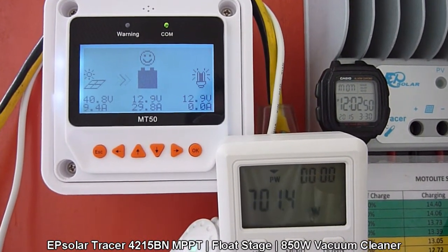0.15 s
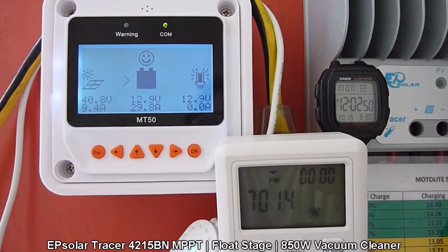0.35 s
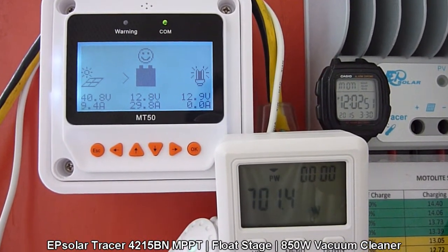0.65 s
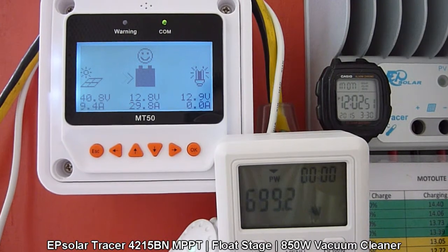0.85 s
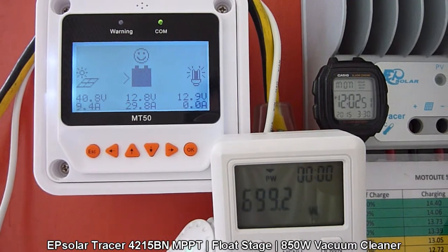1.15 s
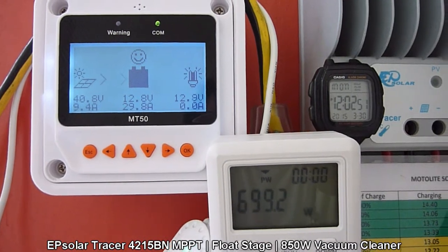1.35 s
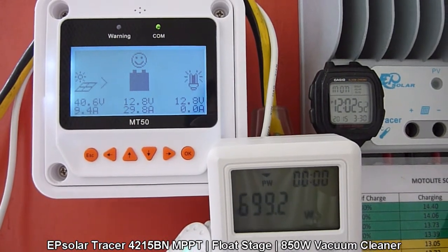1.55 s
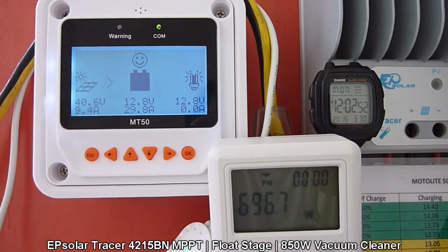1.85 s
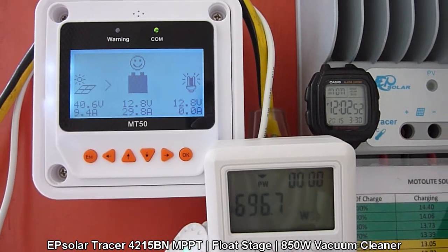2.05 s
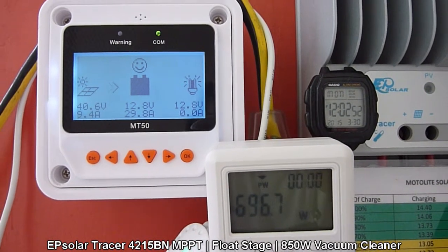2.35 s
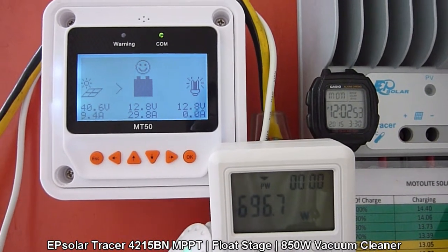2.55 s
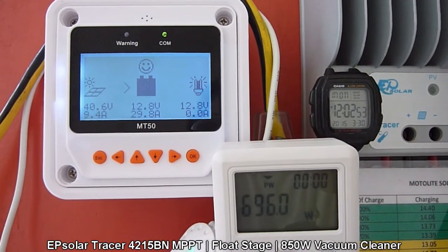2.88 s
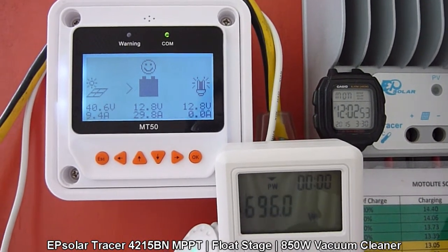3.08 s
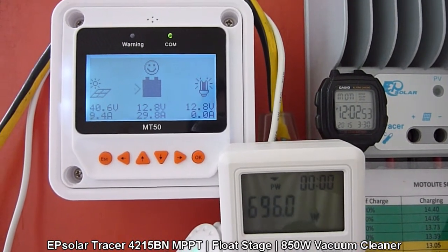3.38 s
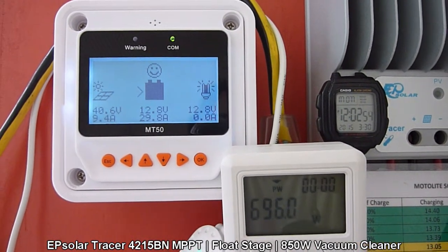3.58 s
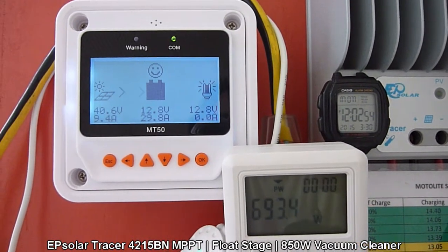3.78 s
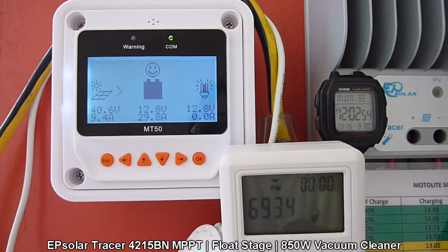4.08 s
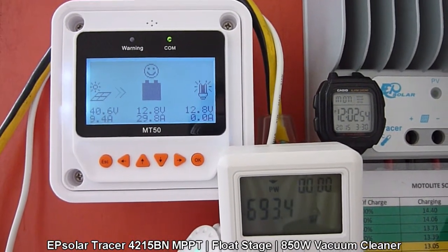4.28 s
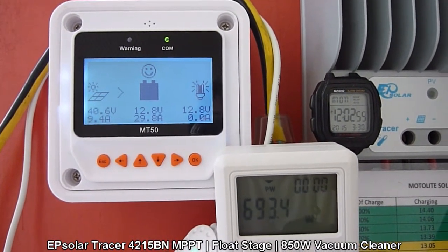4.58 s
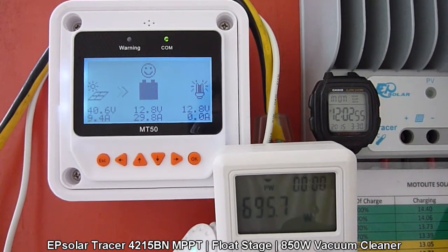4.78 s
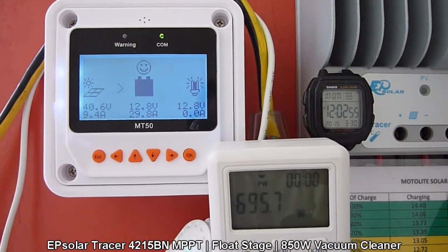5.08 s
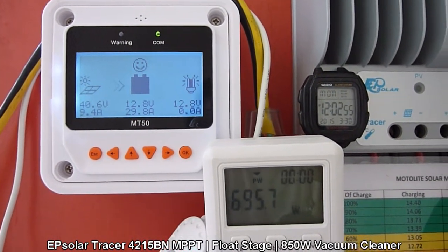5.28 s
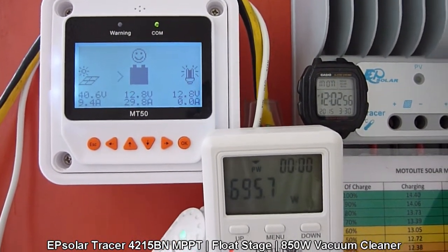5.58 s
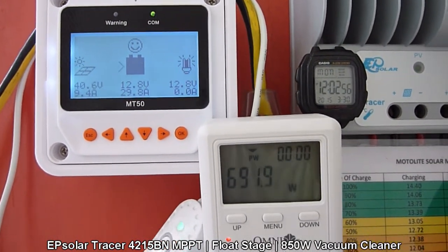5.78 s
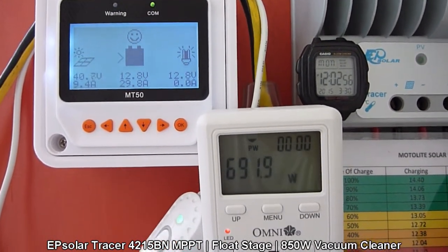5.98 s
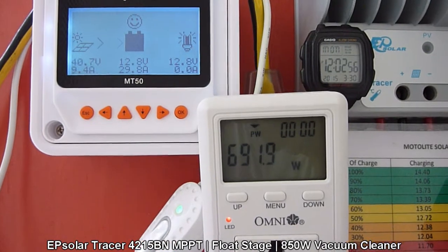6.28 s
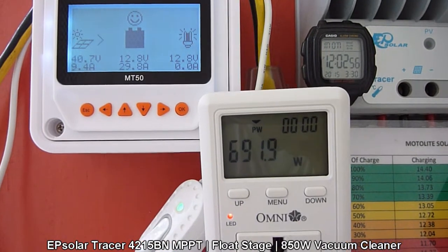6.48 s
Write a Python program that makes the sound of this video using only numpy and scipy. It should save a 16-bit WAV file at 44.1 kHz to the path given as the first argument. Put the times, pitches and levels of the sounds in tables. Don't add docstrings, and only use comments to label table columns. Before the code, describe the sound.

A vacuum cleaner runs continuously a few metres away in a small hard room. Dense, hollow air roar dominates, strongest in the mids, over a steady low motor hum. A thin, clear blade whine sits high above it, swelling and fading as the handheld microphone sways, sagging very slightly in pitch. The roar leans slightly left; the treble is dull and narrow-band. No start, stop or other event.

```python
import sys
import numpy as np
from scipy import signal
from scipy.fft import rfft, irfft
from scipy.io import wavfile

SR = 44100
rng = np.random.default_rng(int(sys.argv[2]) if len(sys.argv) > 2 else 0)


def amplitude_ratio(level_db):
    exponent = np.asarray(level_db, float) / 20
    return 10 ** exponent


def store_wav(level_fs):
    pcm = np.round(np.clip(np.atleast_2d(level_fs), -1, 1) * 32767)
    wavfile.write(sys.argv[1], SR, pcm.T.astype(np.int16))


N = 292824

BLADES, MAGNET_HZ = 12, 120.37
LEFT_LEAD_S, LEAD_TOP_HZ = 5e-5, 1600
SIDE = np.array([[.5], [-.5]])


def rms_one(x):
    return x / np.sqrt(np.mean(x ** 2) + 1e-20)


def in_time(rows):
    s, *columns = np.transpose(rows)
    return [np.interp(np.arange(N) / SR, s, c) for c in columns]


def at_hz(points, hz):
    table_hz, value = np.transpose(points)
    return np.interp(np.log(hz + 1), np.log(table_hz), value)


def drift(rate_hz):
    pole = np.exp(-80 * np.pi * rate_hz / SR)
    noise = rng.standard_normal(N // 40 + 2002)
    slow = signal.lfilter([1], [1, -2 * pole, pole ** 2], noise)[2000:]
    return np.interp(np.arange(N) / 40, np.arange(len(slow)), rms_one(slow - slow.mean()))


def blade_pitch():
    start_hz, sag_hz_per_s, settle_s = 3195.3, 4.7, 2.8
    drop_at_s, drop_length_s, drop_hz = 5.3, .55, 5.3
    s = np.arange(N) / SR
    sag_hz = sag_hz_per_s * np.minimum(s, settle_s)
    dropped = np.clip((s - drop_at_s) / drop_length_s, 0, 1)
    return start_hz - sag_hz - drop_hz * dropped


def motor_tones(blade_hz, blade_db, blade_pan_db):
    tone_orders = [(0, 1), (0, 2), (0, 3), (0, 4), (1, -1), (1, 0), (1, 1), (2, -2), (2, -1), (2, 0),
                   (2, 1), (4, 0), (6, 0), (13, 0), (14, -1), (14, 0), (14, 1), (14, 2), (18, 0), (24, 0)]
    # [level/dB rms, left-right/dB]
    tone_levels = [(-59, 2.5), (-45.5, 1.5), (-76, -4), (-57, 3), (-75, -1.5), (-38, 2), (-53.5, 1.5),
                   (-58.5, 0.5), (-72, 4), (-55, 1.5), (-63.5, 6.5), (-70.5, 3), (-43, 7), (-65.5, -3),
                   (-61.5, -2), (-55, -4), (-73, 5), (-65, 3), (-78, 3.5), (-76.5, -6.5)]
    shaft = 2 * np.pi * np.cumsum(blade_hz) / SR / BLADES
    magnet = 2 * np.pi * MAGNET_HZ * np.arange(N) / SR

    lean = amplitude_ratio(blade_pan_db * SIDE)
    blade_level = amplitude_ratio(blade_db + 1 + .9 * drift(10))
    out = blade_level * lean / lean.mean(axis=0) * np.sin(BLADES * shaft + .9 * SIDE)

    for (turns, pulls), (level_db, pan_db) in zip(tone_orders, tone_levels):
        hz = turns * blade_hz[0] / BLADES + pulls * MAGNET_HZ
        lead = 2 * np.pi * LEFT_LEAD_S * min(hz, LEAD_TOP_HZ)
        flutter_db = min(.4 + hz / 2500, 1.6) * drift(4)
        phase = turns * shaft + pulls * magnet + lead * SIDE
        out += amplitude_ratio(level_db + flutter_db + pan_db * SIDE) * np.sin(phase)
    return np.sqrt(2) * out


def room(hz):
    t60_s, tail_db, corner_hz = 0.12, -3, 1730.0
    s = np.arange(SR // 2) / SR
    tails = rng.standard_normal((2, len(s))) * amplitude_ratio(-60 * s / t60_s) * (s > .004)
    tails /= np.sqrt(np.sum(tails ** 2, axis=1, keepdims=True))
    rise = hz ** 2 / (hz ** 2 + corner_hz ** 2)
    return 1 + amplitude_ratio(tail_db) * rfft(tails, N) * rise


def air_roar(roar_db):
    # [f/Hz, level/dB per Hz]
    air = [(30, -36.5), (47, -31), (60, -18), (110, -21.5), (170, -10.5), (300, -7), (550, -5), (850, -5),
           (1400, 0), (1900, -3), (2300, -9), (2800, -8.5), (4500, -17.5), (6500, -20.5)]
    resonance_hz = [215, 336, 410, 434, 512, 545, 608, 759, 835, 877, 916, 964, 1040, 1083, 1152, 1312,
                    1352, 1384, 1457, 1490, 1545, 1605, 1660, 1800, 1861, 1945, 2010, 2078, 2422, 2725]
    # [width/Hz, boost/dB]
    resonances = [(20, 8.5), (29.5, 5.5), (14, 5), (12.4, 13.5), (22, 3.5), (16, -5), (20, 6.5), (14.4, 13),
                  (20, -1.5), (14, 8.5), (14, 8.5), (14, 9), (20, 8.5), (20, 4.5), (18, 4), (30, 3.5),
                  (12, 6), (18, 9.5), (20, 6.5), (16, 1), (25, 0.5), (50, 5), (25, 6.5), (18, 9), (13, 5.5),
                  (28, 8), (36, -4.5), (54, 3), (18, -1), (110, 3)]
    housing_hz = [460, 705, 795, 1000, 1368, 1405, 2350, 2860, 2900, 3106, 3460, 3835, 4120, 4830, 5958,
                  6460]
    # [width/Hz, boost/dB]
    housing = [(14, -3), (25, 6), (20, 4), (30, -7.5), (10, -15), (10, -2), (60, -3.5), (50, 3), (20, -13),
               (50, 5), (44, 8), (40, 5), (80, 3.5), (120, 2), (60, 1.5), (30, 5)]
    # [f/Hz, correlation/1]
    likeness = [(30, .95), (110, 1), (280, 0.99), (700, 1), (1300, 1), (2200, 0.99), (3500, 0.64),
                (6000, 0.84)]
    # [f/Hz, left-right/dB]
    balance = [(60, -0.5), (170, 1.5), (510, 1.5), (1490, 2), (4340, 3.0), (12700, 1)]
    hz = np.fft.rfftfreq(N, 1 / SR)

    boost_db = 0
    for centre_hz, (width_hz, db) in zip(resonance_hz + housing_hz, resonances + housing):
        boost_db = boost_db + db / (1 + (2 * (hz - centre_hz) / width_hz) ** 2)

    swirl = amplitude_ratio(0.32 * drift(60))
    mid, side = rfft(rng.standard_normal((2, N)) * swirl)
    alike = np.clip(at_hz(likeness, hz), 0, 1)
    both = np.sqrt(1 + alike) * mid + np.sqrt(1 - alike) * side * 2 * SIDE

    lead = np.exp(2j * np.pi * np.minimum(hz, LEAD_TOP_HZ) * LEFT_LEAD_S * SIDE)
    ears = amplitude_ratio(at_hz(balance, hz) * SIDE) * lead
    out = irfft(both * ears * room(hz) * amplitude_ratio(at_hz(air, hz) + boost_db), N)
    return amplitude_ratio(roar_db + 1.33) * rms_one(out)


def scene():
    # [t/s, level/dB, left-right/dB]
    sway = [(0, -44, 9), (.66, -49, 9), (1.95, -53.5, 8), (2.7, -46.5, 5), (3.9, -45, 6), (4.35, -49.5, 6),
            (4.65, -45.5, 6), (5.28, -48, 6), (5.55, -42.5, 5), (6.2, -40.5, 1), (6.64, -41, 0)]
    # [t/s, level/dB]
    flow = [(0, -30), (.8, -29.5), (2, -30.5), (3.2, -30.5), (3.6, -29.5), (4.4, -30.5), (5.3, -29.5),
            (5.7, -31), (6.64, -30)]
    blade_db, blade_pan_db = in_time(sway)
    roar_db, = in_time(flow)
    return motor_tones(blade_pitch(), blade_db, blade_pan_db) + air_roar(roar_db)


def low_pass(x):
    return signal.sosfilt(signal.butter(12, 14400, fs=SR, output="sos"), x)


def record(dry):
    notch_hz, notch_width_hz, camera_rate_hz = 5425, 380, 16000
    # [f/Hz, gain/dB]
    pass_top = [(6300, 0), (6800, -6), (7250, -17), (7450, -34.5), (7560, -50), (8000, -87)]
    pad = 2048
    size = N + 2 * pad
    ramp = np.arange(size)
    fade = np.clip(np.minimum(ramp, ramp[::-1]) / pad, 0, 1)
    x = np.pad(dry, ((0, 0), (pad, pad)), "reflect", reflect_type="odd")
    x = x * np.sin(np.pi / 2 * fade) ** 2

    hz = np.fft.rfftfreq(size, 1 / SR)
    off = 2j * (hz - notch_hz) / notch_width_hz
    notch = (off + .015) / (off + 1)
    x = irfft(rfft(x) * notch * amplitude_ratio(at_hz(pass_top, hz)), size)

    carrier = 2 * np.cos(2 * np.pi * camera_rate_hz * np.arange(size) / SR)
    folded = rfft(x * carrier)
    mirrored = np.clip(camera_rate_hz / np.maximum(hz, 1) - 1, 0, None)
    image_gain = np.where(mirrored < 1, mirrored ** 3.68, 0)
    x += amplitude_ratio(-4.0) * irfft(folded * image_gain, size)
    return low_pass(x[:, pad:-pad])


dry = scene()
out = record(dry)
store_wav(out)
```